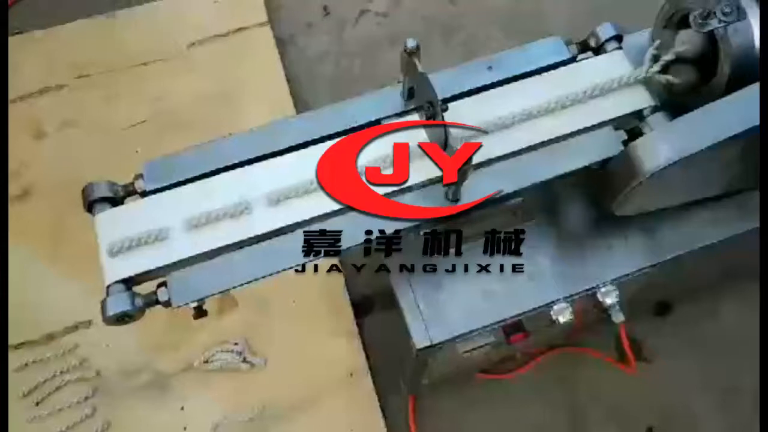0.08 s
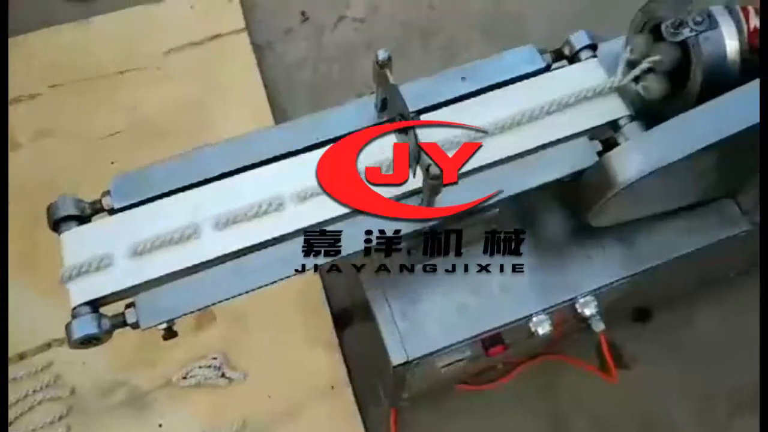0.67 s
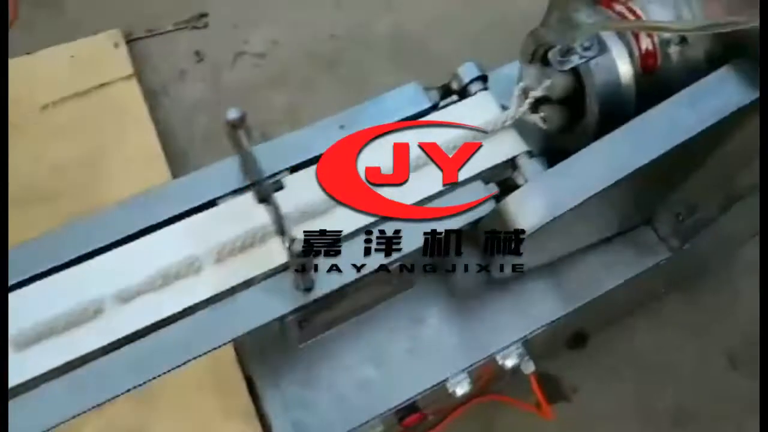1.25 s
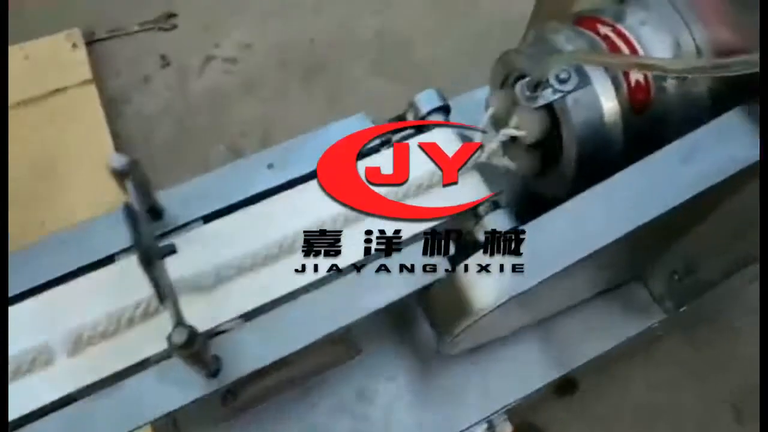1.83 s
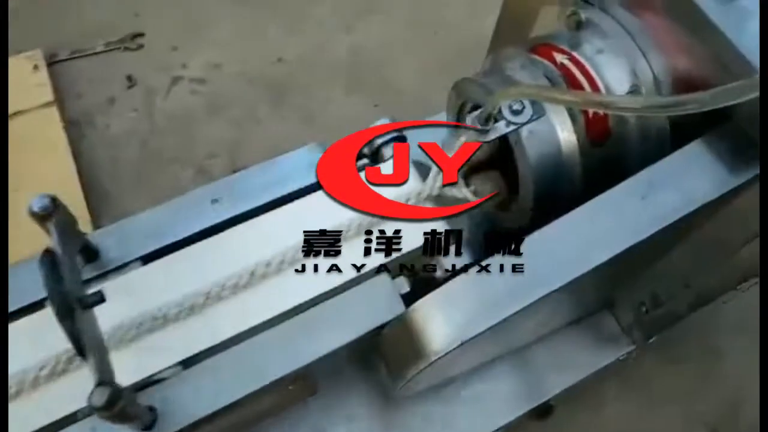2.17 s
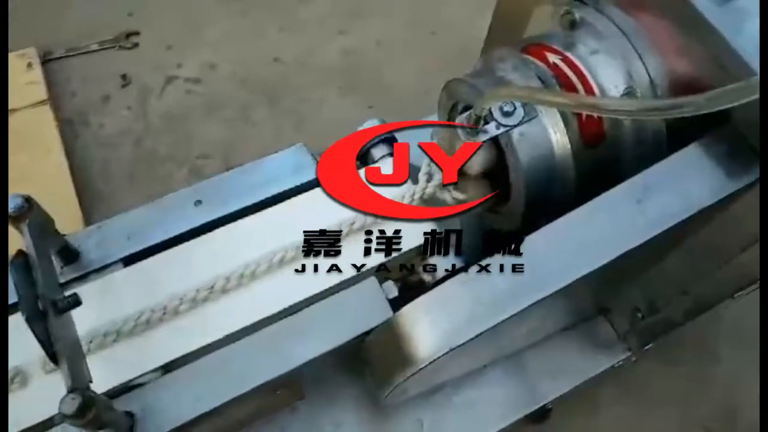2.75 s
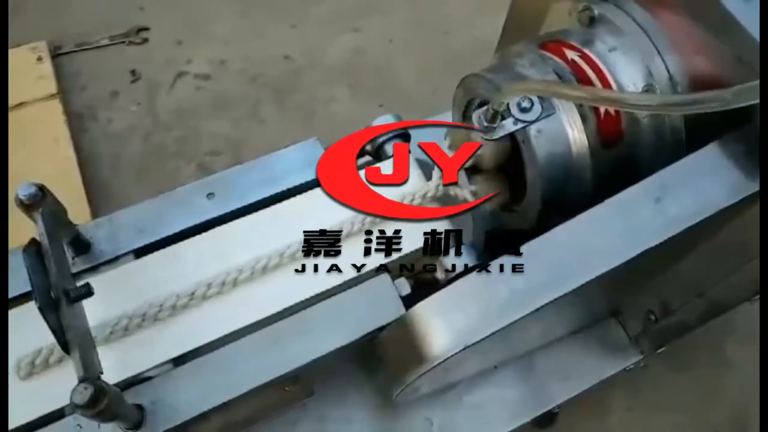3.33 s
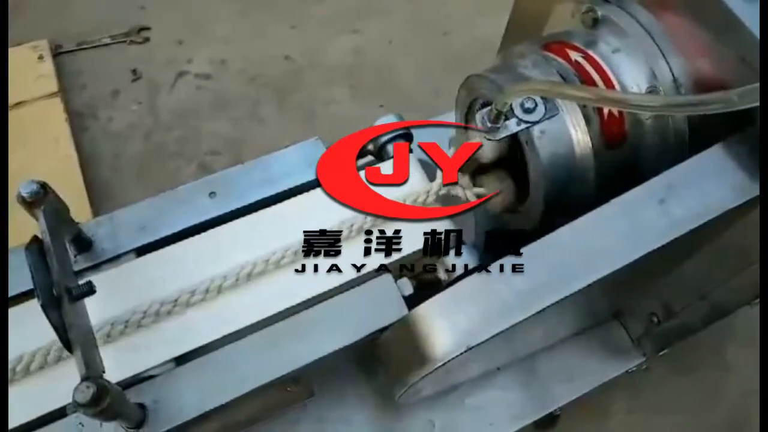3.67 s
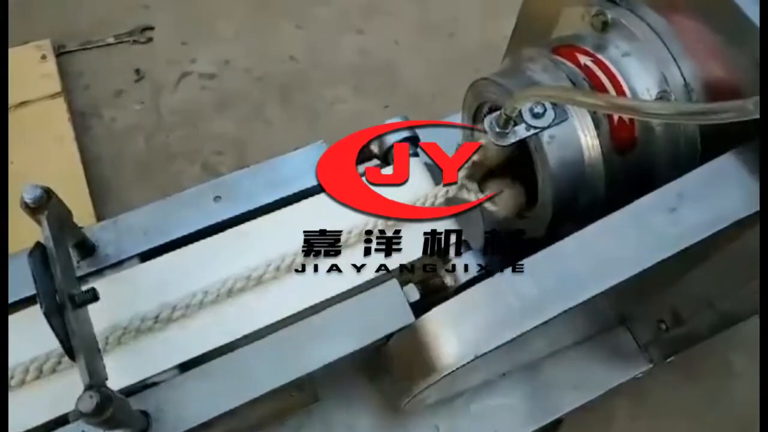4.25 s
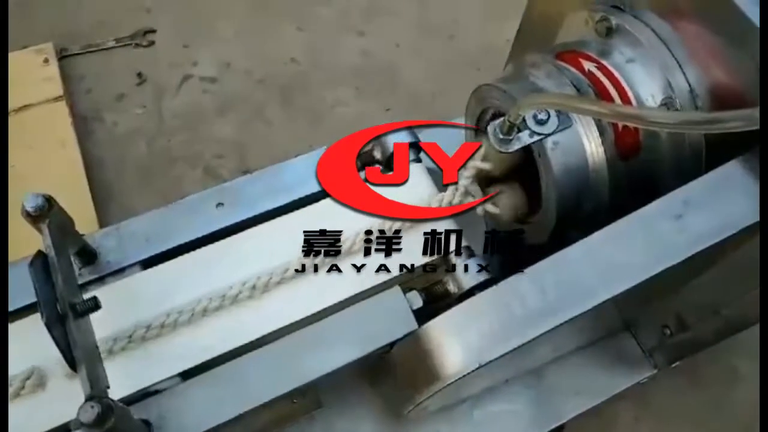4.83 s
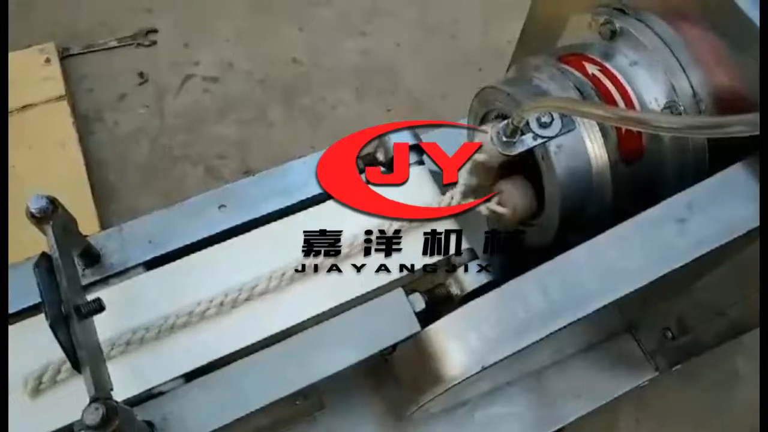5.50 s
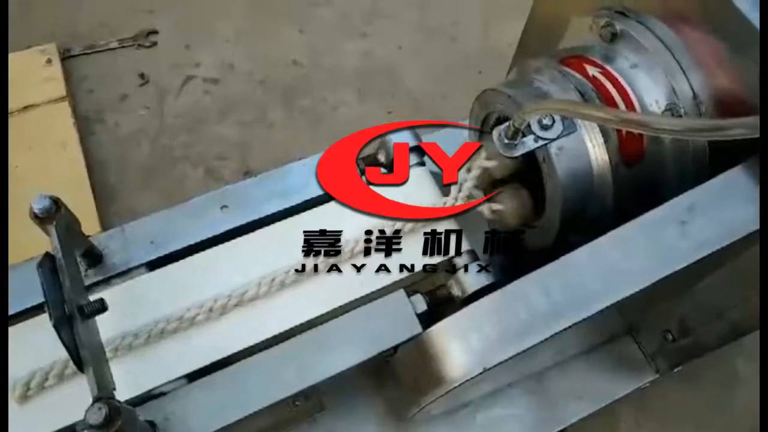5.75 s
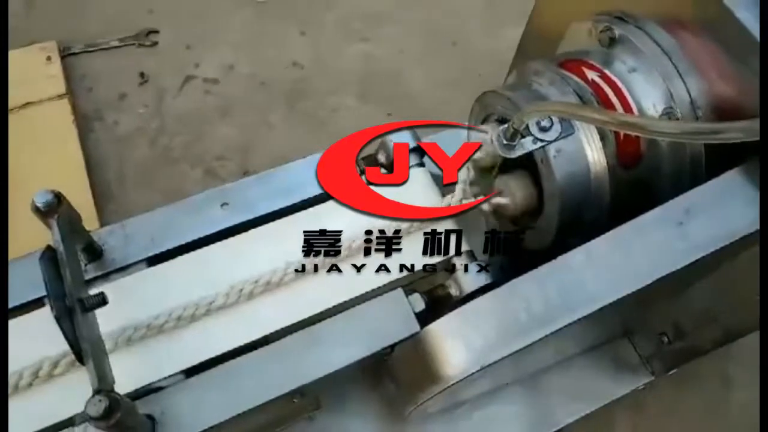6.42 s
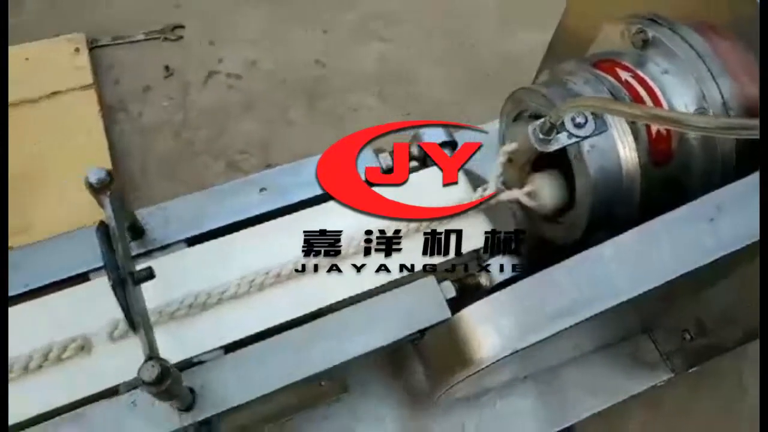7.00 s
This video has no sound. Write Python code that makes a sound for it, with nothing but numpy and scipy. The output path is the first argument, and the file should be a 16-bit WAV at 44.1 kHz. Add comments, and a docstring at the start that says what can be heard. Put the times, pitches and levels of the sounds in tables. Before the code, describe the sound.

A machine motor hums and gears rattle while a metal cutter slams with a loud double clack about every two seconds.

```python
"""Dough-twisting machine, close above

A motor hums through a sheet-steel cabinet and gears rattle, both following one load; a conveyor rubs.
The twisting head scrapes in short swells and clinks; play in the drive gives dull knocks.
About every two seconds the cutter slams down and snaps back, overloading the microphone."""
import sys
import numpy as np
from scipy import signal
from scipy.fft import rfft, irfft
from scipy.io import wavfile

SR = 44100
rng = np.random.default_rng(int(sys.argv[2]) if len(sys.argv) > 2 else 0)


def master_out(mix):
    """Clip the mix to full scale and print it as 16-bit PCM to the path in sys.argv[1]."""
    frames = np.transpose(np.atleast_2d(mix))
    ceiling = np.clip(frames, -1, 1)
    pcm = np.round(ceiling * 32767).astype(np.int16)
    wavfile.write(sys.argv[1], SR, pcm)


N = 310023
TIME_S = np.arange(N) / SR
BINS_HZ = np.arange(N // 2 + 1) * SR / N

# drive load (time [s], level [dB])
DRIVE_LOAD = [(0.7, -4), (1.15, -1), (1.75, 0.5), (2.35, 0.5), (3.0, 1), (3.27, -10.5), (3.7, -6.5),
              (3.92, -14.5), (4.4, -7.5), (4.7, -3.5), (5.0, -4.5), (5.18, -11), (5.35, -6), (5.78, -6.5),
              (5.97, -8), (6.45, -5), (6.67, -4), (7.0, -6.5)]
# motor partials (frequency [Hz], level [dB], waver [ratio])
HUM_PARTIALS = [(99.9, -37, 0.088), (149.4, -31, 0.82), (199.4, -32, 0.95), (249, -36.5, 0.81),
                (303.6, -39.5, 0.8)]
# cabinet panel resonances (frequency [Hz], width [Hz], gain [dB])
CABINET_RESONANCES = [(130, 51, -9), (150.1, 7.1, 2), (191, 19.5, -2), (220.2, 10.1, 2.5),
                      (253, 10.8, -2.5), (291.7, 11, -3.5), (317.6, 37.6, -6.5)]
# gear rattle (frequency [Hz], density [dB])
GEAR_SPECTRUM = [(250, -21), (380, -4.5), (480, 6), (620, 4), (760, 3), (980, 1.5), (1200, 2.5),
                 (1400, 1.5), (1900, -6), (2150, -9.5), (2550, -10.5), (3500, -32), (7000, -29.5),
                 (14000, -33)]
# gear housing resonances (frequency [Hz], width [Hz], gain [dB])
HOUSING_RESONANCES = [(726, 67, 11), (842, 18, 11.5), (2060, 100, 6), (2940, 330, -5), (4380, 48, -7)]
# belt rub (frequency [Hz], density [dB])
BELT_SPECTRUM = [(1500, -36), (2600, 5), (2950, 10), (3300, 6), (3700, 6.5), (4250, 2), (4500, 3.5),
                 (5000, 3), (6000, -10), (7200, -11.5), (9000, -17), (12000, -21), (14500, -36)]
# independently flickering rub bands (low [Hz], high [Hz])
BELT_BANDS = [(1500, 4000), (4000, 6000), (6000, 16000)]
# belt rub envelope (time [s], level [dB])
BELT_LEVEL = [(0.7, -35), (1.15, -34.5), (1.75, -31.5), (2.35, -31), (3.0, -31.5), (3.27, -40),
              (3.62, -39.5), (3.77, -39), (3.95, -41), (4.39, -41.5), (4.55, -35), (5.05, -36), (5.18, -43),
              (5.3, -39), (5.97, -39.5), (6.42, -38.5), (6.67, -40), (6.76, -35)]
# frame rumble (frequency [Hz], density [dB])
FRAME_SPECTRUM = [(15, -10), (60, -10.5), (90, 2), (300, -13), (3000, -43)]

# head scrapes, plus the cutter's dull clatter after its return (the 560 Hz rows) and a hiss-only swell of the
# belt at 4.44 s (time [s], length [s], rub [dB], hiss [dB], pitch [Hz])
SCRAPE_EVENTS = [(0.638, 0.18, -31.5, -55, 840), (0.77, 0.035, -25.5, -34, 1455),
                 (0.917, 0.16, -29.5, -57, 960), (2.144, 0.17, -27, -44, 826),
                 (2.53, 0.037, -33, -48, 1350), (2.775, 0.066, -26.5, -40, 850),
                 (3.419, 0.05, -26.5, -41, 1460), (3.531, 0.04, -31, -51, 2000),
                 (3.594, 0.049, -35.5, -63, 1300), (3.715, .02, -44, -55, 900),
                 (3.972, .015, -35, -51, 1700), (4.227, 0.032, -26, -43, 560), (4.442, 0.16, -50, -37, 855),
                 (4.628, 0.022, -23, -32.5, 860), (4.675, 0.065, -29.5, -32.5, 850),
                 (4.767, 0.055, -34.5, -46, 2180), (4.845, 0.035, -29, -43, 2070),
                 (4.914, .025, -31, -44, 970), (5.045, .015, -32, -37, 870),
                 (5.22, 0.065, -33.5, -39, 1300), (5.312, 0.049, -34.5, -42, 1400),
                 (5.41, 0.3, -65, -38.5, 850), (5.748, 0.059, -54, -37.5, 850),
                 (6.318, .025, -27, -50, 560), (6.837, .012, -30, -50, 1450),
                 (6.915, 0.033, -34, -32.5, 1440), (6.964, 0.022, -27, -38, 1510),
                 (6.998, .025, -32, -34, 1090)]
# head rasp (frequency [Hz], density [dB])
RASP_SPECTRUM = [(450, -6.5), (850, 9.5), (1100, 13.5), (1400, 11), (1800, 7), (2150, 10), (2600, 1),
                 (4000, -26), (7000, -21.5), (14000, -43)]
# steel rung by a scrape (pitch [ratio], width [Hz], gain [dB])
SCRAPE_RESONANCES = [(1, 70, 16), (1.55, 180, -2.5), (2.45, 260, -3)]
# bright rubbing hiss that swells with the scrapes (frequency [Hz], density [dB])
SCRAPE_HISS_SPECTRUM = [(2000, -25), (2700, 2.5), (3200, 9.5), (3700, 8), (4400, 3.5), (5800, -10),
                        (7500, -15), (14000, -22)]
# head parts catching, plus one bounce of the cutter just after the slam at 6.18 s (time [s], length [s], level
# [dB], pitch [Hz])
CLINK_EVENTS = [(0.765, .035, -39, 5900), (0.927, .012, -31, 5000), (0.931, .012, -31, 2000),
                (0.978, .008, -32, 2400), (1.059, .012, -35, 3200), (1.158, .01, -36, 3200),
                (1.235, .02, -36, 3300), (1.272, .02, -40, 5800), (1.303, .012, -33.5, 3300),
                (1.518, .02, -37, 5300), (1.564, .04, -38, 5500), (1.762, .015, -34.5, 3400),
                (1.848, .012, -42, 7400), (1.894, .01, -34, 3400), (2.168, .015, -39, 6000),
                (2.232, .015, -34, 3500), (2.385, .012, -33.5, 3600), (2.517, .012, -37, 4800),
                (2.782, .03, -39, 5900), (2.992, .012, -39, 5400), (3.205, .015, -42, 4300),
                (4.685, .02, -35, 4150), (5.012, .015, -42, 5300), (5.49, .012, -42, 4900),
                (5.538, .012, -40.5, 5400), (5.594, .006, -46, 8500), (5.77, .06, -43, 4900),
                (6.184, .005, -21, 1800), (6.412, .012, -39, 3500)]
# steel rung by a clink (pitch [ratio], width [Hz], gain [dB])
CLINK_RESONANCES = [(.85, 400, 5), (1, 300, 7), (1.12, 400, 2), (1.5, 1800, -9)]

# cutter strokes (slam time [s], strength [dB], thump offset [dB], base chatter [s], return delay [s])
CUTTER_STROKES = [(1.9309, 2.2, 1, 0.008, .1142), (4.0498, 1.2, -1.5, 0.018, .1155),
                  (6.1455, 1.5, -1.5, 0.018, .1158)]
# sliding blade (frequency [Hz], density [dB])
SLIDE_SPECTRUM = [(500, 0), (1500, 0), (2500, -1), (4000, -4), (7000, -17.5), (14000, -26)]
# cutter arm modes (frequency [Hz], level [dB], base t60 [s])
ARM_MODES = [(572, -7, .25), (762, 0, .2), (815, 1, .14), (849, 2, .2), (940, -1, .16), (1314, 2.5, .21),
             (1426, 2, .16), (1612, 2.5, .2), (1767, 3.5, .17), (1865, 3, .14), (2312, 5, .17),
             (2332, 5, .16), (2415, 3.5, .16), (2505, 0, .12), (2722, -1, .22), (3245, -1, .14),
             (3300, -3.5, .12), (3472, -1.5, .16), (3800, -3, .13), (4200, -5, .15), (4542, -2.5, .17),
             (4915, -4.5, .18), (5230, -5.5, .19), (5400, -8, .14), (5840, -9, .13), (6420, -9, .11),
             (6920, -11, .12), (7480, -12, .12)]
# down blow (clash [dB], thump [dB], chatter [ratio], tilt [dB/octave], tail [dB], t60 [ratio])
SLAM_BLOW = (-7.3, -2.2, 2.0, 0.85, -13.3, .92)
# return blow (clash [dB], thump [dB], chatter [ratio], tilt [dB/octave], tail [dB], t60 [ratio])
RETURN_BLOW = (-6.1, -12.5, 0.25, 0.55, -20.5, .75)
# blade bounce after a blow (delay [s], gain [dB], tilt [dB/octave])
BLADE_BOUNCE = (.013, -6, 1.2)
# blade clash before tilt (frequency [Hz], density [dB])
CLASH_SPECTRUM = [(100, -2), (380, -2.5), (700, 1), (1100, 2.5), (1700, -0.5), (2400, 5), (2800, -9.5),
                  (3300, 26), (3900, -2.5), (4500, -5.5), (6000, -4.5), (8500, -8.5), (11500, -9.5),
                  (14500, -18)]
# clash decay (frequency [Hz], base t60 [s])
CLASH_DECAY = [(150, 1), (800, 0.39), (3000, 0.08), (6000, 0.092), (13000, 0.061)]
# struck cabinet modes (frequency [Hz], level [dB], t60 [s])
THUMP_MODES = [(128, -8, .55), (153, 1.5, 0.42), (205.5, -.5, 0.38), (232.7, -2, 0.37), (277.6, -12, 0.6),
               (308.8, -14, 0.29)]
# return spring resonances (frequency [Hz], width [Hz], gain [dB])
SPRING_RESONANCES = [(4230, 120, 3), (4570, 260, 5), (4970, 300, 2), (5500, 350, 1), (5950, 300, 2)]
# knocks on the cabinet: play in the drive, and the cutter arm bottoming out just after a slam (time [s],
# strength [dB])
KNOCK_EVENTS = [(2.554, -14), (3.088, -16.5), (3.314, -15), (4.092, -9), (4.558, -13), (4.991, -15),
                (5.527, -16), (5.729, -13.5), (6.188, -11)]

# echoes off nearby steel panels (delay [s], gain [dB])
PANEL_ECHOES = [(.0023, -26.5), (.0041, -21), (.0067, -26.5), (.0094, -14.5)]
# stereo spread (frequency [Hz], side re mid [dB])
SIDE_SPECTRUM = [(3300, -76), (4100, -58), (5500, -16.5), (8000, -9), (12000, -6.5)]
# microphone notches (frequency [Hz], width [Hz], gain [dB])
MIC_DIPS = [(1198, 234, -4.5), (2565, 120, -6), (3040, 42, -4), (3952, 130, -26), (7700, 86, -15)]


def from_db(db):
    """Decibels to gain."""
    return 10 ** (np.asarray(db) / 20)


def unit_rms(x):
    """Scale to rms 1."""
    return x / np.sqrt(np.mean(x ** 2) + 1e-20)


def at_hz(table, hz):
    """Interpolate over log frequency."""
    known_hz, values = np.transpose(table)
    return np.interp(np.log(hz + 1e-9), np.log(known_hz), values)


def colour(x, spectrum):
    """Apply a spectrum, rolled off below its first point; rms 1."""
    skirt = np.minimum(BINS_HZ / spectrum[0][0], 1) ** 2
    return unit_rms(irfft(rfft(x) * from_db(at_hz(spectrum, BINS_HZ)) * skirt, N))


def bandpass(x, band_hz, order=4):
    """Butterworth band-pass."""
    return signal.sosfilt(signal.butter(order, band_hz, "band", fs=SR, output="sos"), x)


def drift(rate_hz):
    """Smooth random wander; rms 1."""
    return unit_rms(irfft(rfft(rng.standard_normal(N)) * np.exp(-(BINS_HZ / rate_hz) ** 2), N))


def resonate(x, resonances, pitch=1):
    """Parallel two-pole resonators, alternating in sign; pitch multiplies their frequencies."""
    out = 0
    for k, (centre, width_hz, db) in enumerate(resonances):
        hz = pitch * centre
        peak = signal.iirpeak(hz, hz / width_hz, fs=SR)
        out += (-1) ** k * from_db(db) * signal.lfilter(*peak, x + 1e-18)
    return out


def ring(modes, t, detune):
    """Struck body: decaying sines with random spread in level and tuning."""
    out = 0
    for k, (hz, db, t60_s) in enumerate(modes):
        decay = from_db(db + rng.normal(0, 1.0) - 60 * t / t60_s)
        detuned_hz = hz * (1 + detune * rng.standard_normal())
        out += (-1) ** k * decay * np.sin(2 * np.pi * detuned_hz * t)
    return out


def grains(per_s, spread_db):
    """Random contacts of uneven strength; rms 1."""
    sizes = from_db(spread_db * np.minimum(rng.exponential(1, N), 4)) * rng.choice([-1, 1], N)
    return unit_rms(sizes * (rng.random(N) < per_s / SR))


def swell(t, length_s, attack_s, t60_s):
    """Envelope: linear rise, hold until length_s, decay."""
    return np.minimum(t / attack_s, 1) * from_db(-60 * np.maximum(t - length_s, 0) / t60_s)


def add(out, time_s, sound):
    """Mix a sound in at time_s."""
    start = min(int(time_s * SR), N)
    out[start:start + len(sound)] += sound[:N - start]


def motor():
    """Magnetic hum and harmonics, each wavering in level and phase."""
    out = 0
    for hz, db, waver in HUM_PARTIALS:
        sway = 1 + waver * (drift(15.0) + 1j * drift(13.5)) / np.sqrt(2)
        tone = np.exp(2j * np.pi * (hz * TIME_S + rng.random()))
        out += from_db(db) * unit_rms(np.real(sway * tone))
    return out


def cabinet(level_db, shaft_hz=24.3):
    """The drive shakes the steel panels; their boom throbs with the shaft."""
    throb = 1 + 0.4 * np.sin(2 * np.pi * shaft_hz * TIME_S + drift(2.6))
    boom = resonate(throb * grains(per_s=770, spread_db=1.0), CABINET_RESONANCES)
    return from_db(level_db) * unit_rms(bandpass(boom, [112, 380]))


def gears(level_db):
    """Teeth chatter in throbbing clumps and ring the housing."""
    throb = 1 + 0.11 * np.sin(2 * np.pi * 21.0 * TIME_S) + 0.024 * np.sin(2 * np.pi * 25.0 * TIME_S)
    teeth = grains(per_s=3500, spread_db=1.0) * throb * from_db(1.16 * drift(23))
    housing = from_db(-8) * unit_rms(resonate(teeth[::-1], HOUSING_RESONANCES))
    return from_db(level_db) * unit_rms(colour(teeth, GEAR_SPECTRUM) + housing)


def conveyor(level_db, flicker_db=1.5, flicker_hz=20):
    """The belt crosses its bed in tiny slips, now duller, now brighter."""
    slips = grains(per_s=9000, spread_db=2.2) * from_db(1.1 * drift(45))
    rub = colour(slips, BELT_SPECTRUM)
    bands = [bandpass(rub, band_hz) * from_db(flicker_db * drift(flicker_hz)) for band_hz in BELT_BANDS]
    return from_db(level_db) * unit_rms(sum(bands))


def frame(level_db, shudder_db=-34, shudder_t60_s=0.83):
    """The frame rumbles and shudders at each slam."""
    shake = from_db(level_db)
    for time_s, db, *_ in CUTTER_STROKES:
        add(shake, time_s, from_db(shudder_db + db - 60 * TIME_S / shudder_t60_s))
    return shake * colour(rng.standard_normal(N), FRAME_SPECTRUM)


def scrapes():
    """The turning head rubs in swells: rasp, ringing steel, bright hiss; the same swells give the cutter's dull
    clatter after its return and one swell of the belt."""
    out, t = np.zeros(N), TIME_S[:SR // 2]
    slips = grains(per_s=6600, spread_db=3.5) * from_db(3.0 * drift(48))
    rasp = colour(slips, RASP_SPECTRUM)
    hiss = colour(rng.standard_normal(N), SCRAPE_HISS_SPECTRUM)
    for time_s, length_s, rub_db, hiss_db, pitch_hz in SCRAPE_EVENTS:
        span = (int(time_s * SR) + np.arange(len(t))) % N
        steel = resonate(slips[::-1][span], SCRAPE_RESONANCES, pitch_hz)
        rub = unit_rms(rasp[span] + from_db(-5) * unit_rms(steel))
        envelope = swell(t, length_s, attack_s=0.008, t60_s=0.2)
        add(out, time_s, envelope * (from_db(rub_db) * rub + from_db(hiss_db) * hiss[span]))
    return out


def clinks():
    """Head parts catch, and the cutter bounces once: brief runs of tiny impacts ring small steel pieces."""
    out, t = np.zeros(N), TIME_S[:SR // 5]
    impacts = grains(per_s=1700, spread_db=-3.5)
    for k, (time_s, length_s, db, pitch_hz) in enumerate(CLINK_EVENTS):
        run = np.roll(impacts, k * len(t))[:len(t)]
        steel = unit_rms(resonate(run, CLINK_RESONANCES, pitch_hz))
        add(out, time_s, from_db(db) * swell(t, length_s, attack_s=0.003, t60_s=0.075) * steel)
    return out


def slide(slam_lead_s=0.043, return_lead_s=0.085, modes_below_hz=2600):
    """The blade rubs its guide, harder toward each stop; the lower arm modes sing."""
    pressure = np.zeros(N)
    for slam_s, *_, delay_s in CUTTER_STROKES:
        travels = [(slam_s, slam_lead_s, -27), (slam_s + delay_s, return_lead_s, -26.5)]
        for stop_s, length_s, db in travels:
            rise = np.sqrt(TIME_S[TIME_S < length_s] / length_s)
            add(pressure, stop_s - length_s, from_db(db) * rise)
    friction = rng.standard_normal(N)
    resonances = [(hz, 60, db) for hz, db, _ in ARM_MODES if hz < modes_below_hz]
    singing = unit_rms(resonate(friction, resonances))
    return pressure * (0.83 * singing + 0.97 * colour(friction, SLIDE_SPECTRUM))


def clash(t, chatter_s, tilt_db_oct, tail_db, t60_ratio, room_t60_s=0.71):
    """Dense plate modes as noise bands, decaying slower during blade chatter, plus a room tail."""
    edges_hz = np.geomspace(90, 16000, num=21)
    centres_hz = np.sqrt(edges_hz[1:] * edges_hz[:-1])
    density_db = at_hz(CLASH_SPECTRUM, centres_hz) + tilt_db_oct * np.log2(centres_hz / 2500)
    gains = from_db(density_db) * np.sqrt(np.diff(edges_hz))
    gains /= np.linalg.norm(gains)
    decay_time_s = 0.55 * np.minimum(t, chatter_s) + np.maximum(t - chatter_s, 0)
    out = 0
    for low_hz, high_hz, hz, gain in zip(edges_hz, edges_hz[1:], centres_hz, gains):
        band = unit_rms(bandpass(rng.standard_normal(len(t)), [low_hz, high_hz], order=3))
        direct = from_db(-60 * decay_time_s / (t60_ratio * at_hz(CLASH_DECAY, hz)))
        tail = from_db(tail_db - 2.5 * np.log2(max(hz / 1500, 1)) - 60 * t / room_t60_s)
        out += gain * band * np.hypot(direct, tail)
    return out * (1 - np.exp(-t / 0.0017))


def thump(t):
    """Low cabinet modes, tuned a little differently at each strike."""
    return from_db(-7) * ring(THUMP_MODES, t, detune=0.019)


def blow(kind, thump_offset_db, chatter_s, arm_db):
    """The blade clashes, bounces once, rings the arm and thumps the cabinet."""
    clash_db, thump_db, chatter_ratio, tilt_db_oct, tail_db, t60_ratio = kind
    bounce_s, bounce_db, bounce_tilt_db_oct = BLADE_BOUNCE
    t = TIME_S[:SR * 3 // 4]
    crunch = clash(t, chatter_ratio * chatter_s, tilt_db_oct, tail_db, t60_ratio)
    bounce = from_db(bounce_db) * clash(t, 0, bounce_tilt_db_oct, tail_db, t60_ratio)
    crunch += np.pad(bounce, (int(bounce_s * SR), 0))[:len(t)]
    modes = [(hz, db, t60_ratio * t60_s) for hz, db, t60_s in ARM_MODES]
    arm = from_db(arm_db) * ring(modes, t, detune=0.0021) * (1 - np.exp(-t / 0.0028))
    boom = from_db(thump_db + thump_offset_db) * thump(t) * (1 - np.exp(-t / 0.005))
    return from_db(clash_db) * crunch + arm + boom


def spring(level_db=-7, attack_s=0.0012, t60_s=0.036):
    """The return spring gives a short, bright snap."""
    t = TIME_S[:SR // 5]
    envelope = from_db(level_db - 60 * t / t60_s) * (1 - np.exp(-t / attack_s))
    return envelope * unit_rms(resonate(rng.standard_normal(len(t)), SPRING_RESONANCES))


def cutter():
    """The arm slides down, slams, slides back and snaps against its rest."""
    out = np.zeros(N)
    for slam_s, db, thump_offset_db, chatter_s, delay_s in CUTTER_STROKES:
        gain = from_db(db)
        add(out, slam_s, gain * blow(SLAM_BLOW, thump_offset_db, chatter_s, arm_db=-18.4))
        add(out, slam_s + delay_s, gain * blow(RETURN_BLOW, thump_offset_db, chatter_s, arm_db=-21.2))
        add(out, slam_s + delay_s, gain * spring())
    return out + slide()


def knocks(settle_s=0.185, settle_db=-9, attack_s=0.005, damping_db_per_s=200):
    """The settling cutter arm and play in the drive bump the cabinet."""
    out, t = np.zeros(N), TIME_S[:SR // 3]
    settling = [(slam_s + settle_s, db + settle_db) for slam_s, db, *_ in CUTTER_STROKES]
    envelope = from_db(-damping_db_per_s * t) * (1 - np.exp(-(t / attack_s) ** 2))
    for time_s, db in settling + list(KNOCK_EVENTS):
        add(out, time_s, from_db(db) * envelope * thump(t))
    return out


def reflect(x):
    """Close panel echoes add a hollow colour at unchanged level."""
    out = x.copy()
    for delay_s, db in PANEL_ECHOES:
        add(out, delay_s, from_db(db) * x)
    return unit_rms(out) * np.std(x)


def widen(x, t60_s=0.06):
    """The treble is spread between left and right; the lows stay centred."""
    t = TIME_S[:SR // 16]
    smear = rng.standard_normal(len(t)) * from_db(-60 * t / t60_s)
    smear /= np.linalg.norm(smear)
    side = irfft(rfft(x) * rfft(smear, N) * from_db(at_hz(SIDE_SPECTRUM, BINS_HZ)), N)
    return np.array([x + side, x - side])


def scene(start_s=0.649):
    """The whole machine in stereo, cutting in at start_s."""
    load_db = np.interp(TIME_S, *np.transpose(DRIVE_LOAD))
    drive = from_db(0.65 * load_db) * motor() + cabinet(-23.5 + 0.42 * load_db) + knocks()
    head = gears(-26 + 0.92 * load_db) + scrapes() + clinks()
    belt = conveyor(np.interp(TIME_S, *np.transpose(BELT_LEVEL)))
    machine = drive + reflect(head + belt) + cutter() + frame(-50.5 + 0.42 * load_db)
    gate = np.clip((TIME_S - start_s) / 0.0017, 0, 1)
    return widen(machine) * gate


def record(dry, ceiling=0.95, cutoff_hz=14350):
    """Microphone: narrow dips, soft overload on the blows, steep low-pass."""
    for hz, width_hz, db in MIC_DIPS:
        band = signal.lfilter(*signal.iirpeak(hz, hz / width_hz, fs=SR), dry)
        dry = dry - (1 - from_db(db)) * band
    clipped = dry / (1 + (dry / ceiling) ** 6) ** (1 / 6)
    return signal.sosfilt(signal.ellip(10, 0.2, 80, cutoff_hz, fs=SR, output="sos"), clipped)


dry = scene()
out = record(dry)
master_out(out)
```